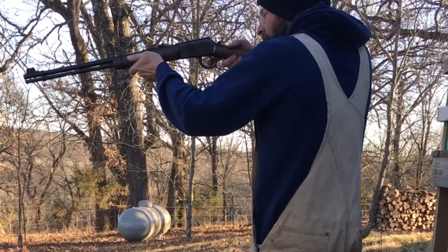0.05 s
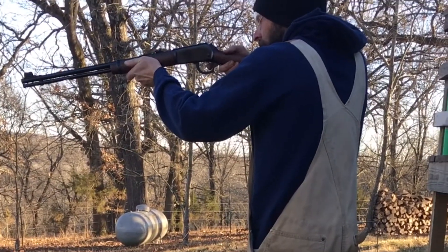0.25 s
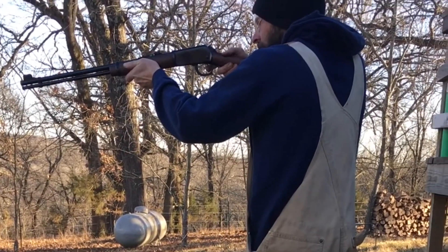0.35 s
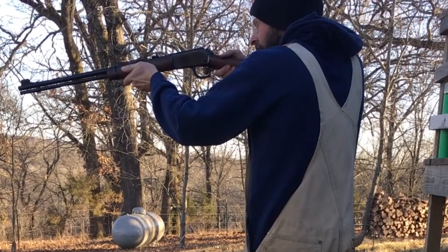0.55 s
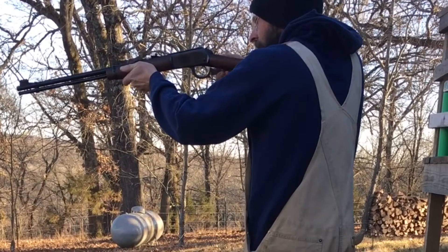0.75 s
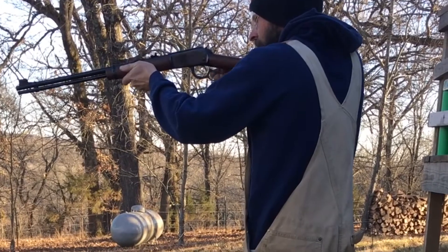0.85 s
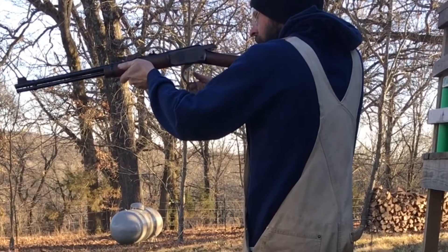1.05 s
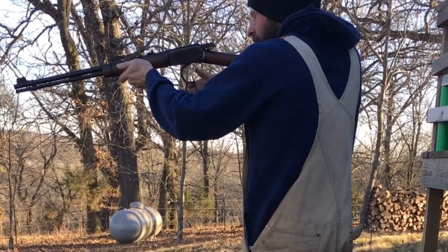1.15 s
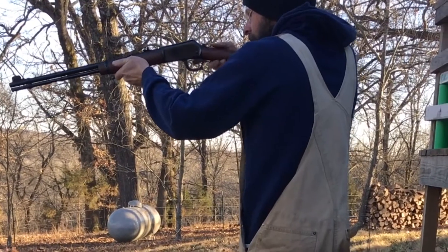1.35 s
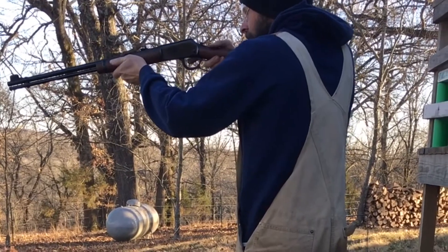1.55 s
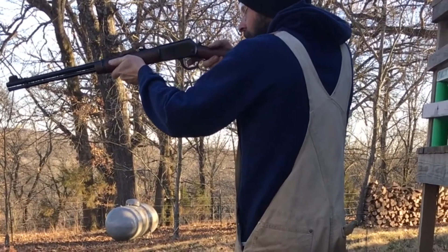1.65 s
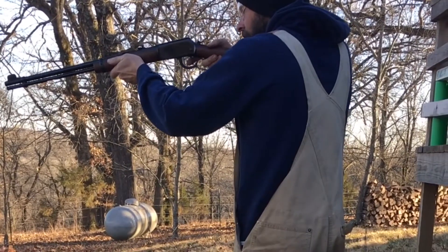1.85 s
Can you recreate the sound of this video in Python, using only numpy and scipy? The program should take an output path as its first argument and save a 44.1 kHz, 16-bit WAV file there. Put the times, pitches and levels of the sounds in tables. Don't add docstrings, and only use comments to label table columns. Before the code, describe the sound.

Single sharp rifle shot in a wooded yard, quick metal hit, rolling echo, lever clicks open and shut

```python
import sys
import numpy as np
from scipy import signal
from scipy.io import wavfile
from scipy.ndimage import uniform_filter1d

SR = 44100
rng = np.random.default_rng(int(sys.argv[2]) if len(sys.argv) > 2 else 0)


def generate_wav(sig):
    pcm = np.round(np.clip(np.atleast_2d(sig).T, -1, 1) * 32767).astype(np.int16)
    wavfile.write(sys.argv[1], SR, pcm)


def to_linear_factor(level_db):
    exponent = np.asarray(level_db, float) / 20
    return 10 ** exponent


N = 83790


def evened(x):
    return x / np.sqrt(np.mean(x ** 2) + 1e-20)


def read(points, hz):
    f, value = np.transpose(points)
    return np.interp(np.log(hz + 1), np.log(f + 1), value)


def add(mix, s, sound):
    part = mix[round(s * SR):][:len(sound)]
    part += sound[:len(part)]


def colour(x, points, tilt_db=0):
    hz = abs(np.fft.fftfreq(8192, 1 / SR))
    tilt = tilt_db * np.log2(np.clip(hz, 300, None) / 4000)
    log_gain = np.log(to_linear_factor(read(points, hz) + tilt))
    phase = -signal.hilbert(log_gain).imag
    taps = np.fft.ifft(np.exp(log_gain + 1j * phase)).real[:4096]
    return signal.oaconvolve(x, taps / np.linalg.norm(taps))[:len(x)]


def ring(modes, t, phases):
    x = 0
    for (hz, db, t60), phase in zip(modes, phases):
        x = x + to_linear_factor(db - 60 * t / t60) * np.sin(2 * np.pi * hz * t + phase)
    return x / np.sqrt(sum(to_linear_factor(2 * db) for _, db, _ in modes))


# (time [s], level [dB], length [s])
SHOCK_FRONTS = [
    (.2188, -6, .00005),
    (.2195, -2, .00008),
    (.2227, -3, .00008),
    (.2260, -12, .0001),
]
# (frequency [Hz], level [dB per Hz])
GAS_SPECTRUM = [(150, -18.5), (350, 0), (800, -2.5), (1450, 1.5), (3300, -6), (12800, -10), (15700, -11.5),
                (16500, -40.5)]
GAS_START_S, GAS_RISE_S, GAS_HOLD_S, GAS_T60 = .2165, 0.006, 0.013, 0.11
GAS_DB = -11


def blast():
    out, t = np.zeros(N), np.arange(SR // 4) / SR
    front_t = t[:400]
    for s, db, length in SHOCK_FRONTS:
        add(out, s, -to_linear_factor(db) * (1 - front_t / length) * np.exp(-front_t / length))
    rise = np.minimum(.3 + t / GAS_RISE_S, 1)
    decay = to_linear_factor(GAS_DB - 60 * np.maximum(t - GAS_HOLD_S, 0) / GAS_T60)
    add(out, GAS_START_S, rise * decay * colour(rng.standard_normal(len(t)), GAS_SPECTRUM))
    return out


# (time [s], level [dB], first half swing [s], strongest after [s], sign and weight [1])
PRESSURE_SWINGS = [
    (0.21, -17.5, .0068, .005, 1),
    (0.22, -3, 0.0016, 0.0022, -0.81),
    (.2232, -1.5, 0.006, 0.0063, -0.85),
    (0.2032, -33, 0.018, 0.0065, -1.45),
    (.1962, -28.5, .001, 0.0011, 0.98),
    (.2185, -15, .0004, .0015, 1),
    (.2865, -35, .002, .002, 1),
    (.291, -33, .005, .006, -1),
    (.491, -34, .0057, .006, 1),
    (.553, -47, .006, .007, 1),
]
SLOWING = .79


def thumps():
    out, t = np.zeros(N), np.arange(SR // 8) / SR
    for s, db, half, top, sign in PRESSURE_SWINGS:
        swell = t / top * np.exp(1 - t / top)
        add(out, s, sign * to_linear_factor(db) * swell * np.sin(np.pi * (t / half) ** SLOWING))
    return out


# (frequency [Hz], level [dB], decay t60 [s])
PLATE_MODES = [(1900, 2, .014), (2250, 1, .016), (2560, -2, .018), (2772, -3, .075), (4635, -3, .045),
               (6078, -12, .045), (6616, 0, .05), (6880, -2, .06), (8300, -11, .03), (9044, -14, .08),
               (9518, -10, .044), (11460, -13, .09), (12510, -13, .13), (13040, -18, .085),
               (14510, -27, .2)]
# (frequency [Hz], level [dB per Hz])
SPLAT_SPECTRUM = [(240, -63.5), (400, -13), (1500, -8.5), (3300, -10.5), (5460, -12.5), (6800, -5),
                  (10500, -18.5), (12900, -12.5), (16500, -38)]
# (frequency [Hz], level [dB per Hz])
RETURN_SPECTRUM = [(600, -25), (1500, -6), (2770, 0), (4600, -12), (7000, -18), (16000, -22)]
PLATE_S, RETURN_DELAY_S, SPLAT_T60 = .2872, .024, 0.05
PLATE_DB, SPLAT_DB, RETURN_DB = -3, -10.5, -22


def plate():
    out, t = np.zeros(N), np.arange(SR // 2) / SR
    hit = to_linear_factor(PLATE_DB) * ring(PLATE_MODES, t, rng.uniform(0, 2 * np.pi, len(PLATE_MODES)))
    hit += to_linear_factor(SPLAT_DB - 60 * t / SPLAT_T60) * colour(rng.standard_normal(len(t)), SPLAT_SPECTRUM)
    add(out, PLATE_S, hit * np.minimum(t / 0.00046, 1))
    copy = to_linear_factor(RETURN_DB) * colour(hit, RETURN_SPECTRUM)
    add(out, PLATE_S + RETURN_DELAY_S, copy * np.minimum(t / .002, 1))
    return out


CLICK_S = [.1958, .199, .2078, .211, .888, .9005, .931, .9333, .953, .9553, 1.197, 1.2005, 1.2048, 1.2085,
           1.2128, 1.2215, 1.226, 1.239, 1.2445, 1.25, 1.2542, 1.2585, 1.2645, 1.275, 1.285, 1.069, 1.5115,
           1.532, 1.829, 1.385]
# (level [dB], brightness [dB per octave], decay t60 [s])
CLICKS = [(-22.5, 1.5, 0.0047), (-19, -3, 0.0046), (-26, -5.5, 0.025), (-29, 3, 0.0089), (-48, 1, .015),
          (-22, 0, .009), (-35, 0, .008), (-29, 5, .007), (-42, 4, .01), (-12.5, -2, .02), (-38, 6, .009),
          (-44, 2, .01), (-32, 0, .012), (-27, 0, .016), (-30, -1, .016), (-38, 5, .01), (-36, -2, .012),
          (-37, -5, .03), (-42, -3, .015), (-25, 1, .014), (-6, 2, .011), (-8.5, 2.5, .018),
          (-19, -3.5, 0.025), (-36.5, -5.5, 0.057), (-40.5, -15, 0.1), (-54, 4, 0.018), (-51, -2, 0.022),
          (-52.5, 6, 0.12), (-54, 6, 0.021), (-51.5, -4.5, 0.11)]
# (frequency [Hz], level [dB], decay t60 [s])
STEEL_MODES = [(960, -16, .04), (1180, -5, .05), (2600, -12, .03), (4517, -10, .04), (6185, -12, .04),
               (7095, -7, .03), (8600, -9, .025), (10030, -9, .03), (11260, -11, .03), (13800, -13, .025)]
# (frequency [Hz], level [dB per Hz])
SNAP_SPECTRUM = [(200, -50), (400, -34), (800, -23), (1250, -10), (2570, -9), (7000, -7), (13900, -11),
                 (16700, -25)]
TICK_DB, STEEL_DB, RATTLE_DB, RATTLE_T60 = 4, -0.5, -22, 0.15


def action():
    out, t = np.zeros(N), np.arange(6000) / SR
    noise = rng.standard_normal((len(CLICKS), 6000))
    phases = rng.uniform(0, 2 * np.pi, (len(CLICKS), len(STEEL_MODES)))
    for s, (db, tilt_db, t60), v, p in zip(CLICK_S, CLICKS, noise, phases):
        modes = [(hz, d + tilt_db * np.log2(hz / 4000), r) for hz, d, r in STEEL_MODES]
        fade = to_linear_factor(-60 * t / t60) + to_linear_factor(RATTLE_DB - 60 * t / RATTLE_T60)
        snap = v * fade * np.minimum(t * SR / 10, 1)
        snap[20] += to_linear_factor(TICK_DB)
        steel = to_linear_factor(STEEL_DB - 30 * t / t60) * ring(modes, t, p)
        add(out, s, 0.35 * to_linear_factor(db) * (colour(snap, SNAP_SPECTRUM, tilt_db) + steel))
    return out


# (time [s], length [s], level [dB])
SLIDES = [
    (0.889, 0.11, -56),
    (1.196, 0.052, -59),
]


def slides():
    out = np.zeros(N)
    for s, length, db in SLIDES:
        t = np.arange(0, length, 1 / SR)
        v = rng.standard_normal((2, 6000))[:, :len(t)]
        grit = to_linear_factor(2.7 * evened(uniform_filter1d(v[0], 60))) * v[1]
        stroke = np.sin(np.pi * t / length) ** 0.3
        add(out, s, to_linear_factor(db) * stroke * colour(grit, SNAP_SPECTRUM, 0.84))
    return out


# (time [s], frequency [Hz],
# level [dB], decay t60 [s])
PINGS = [(.857, 9975, -68, .07), (.9025, 11983, -46, .035), (.911, 12618, -50, .1),
         (.9342, 15300, -28, .013), (.9008, 14000, -29, .008), (.9008, 11070, -29, .008),
         (.9333, 11500, -31, .006), (.9333, 10000, -35, .005), (.936, 7100, -42, .02),
         (.960, 12834, -52, .12), (.982, 12834, -59, .13), (1.006, 9518, -63, .2), (1.035, 12597, -67, .12),
         (1.441, 4517, -69, .3), (1.441, 2772, -72, .1), (1.876, 4517, -73, .2), (1.876, 9545, -76, .2),
         (1.876, 12624, -75, .2)]
# (time [s], frequency [Hz], level [dB], decay t60 [s])
STOCK = [
    (.9555, 1180, -30, .035),
    (.9555, 1400, -35, .03),
    (1.2128, 1230, -41, .04),
    (1.2545, 1170, -23, .045),
    (1.257, 330, -49, .12),
    (1.275, 620, -50, .12),
    (1.257, 2600, -31, .03),
    (1.275, 1200, -42, .06),
]


def pings():
    out, t = np.zeros(N), np.arange(8000) / SR
    notes = PINGS + STOCK
    for (s, hz, db, t60), v in zip(notes, rng.standard_normal((len(notes), 8000))):
        waver_db = 4.0 * evened(uniform_filter1d(v, 120))
        envelope = to_linear_factor(db + waver_db - 60 * t / t60) * np.minimum(t * 1000, 1)
        add(out, s, envelope * np.sin(2 * np.pi * hz * t))
    return out


# (frequency [Hz], decay t60 [s])
YARD_DECAY = [(500, 0.9), (1500, 0.38), (4000, 1), (8000, 0.93), (15000, 0.96)]


def yard(x):
    taps = np.zeros(SR)
    places = np.arange(200, SR - 20, 20)[:2190] + rng.integers(0, 20, 2190)
    taps[places] = rng.choice([-1., 1.], 2190)
    hz, t, z = signal.stft(taps, SR, nperseg=256)
    decay = to_linear_factor(-60 * t / read(YARD_DECAY, hz)[:, None])
    tail = signal.istft(z * decay, SR, nperseg=256)[1]
    return signal.fftconvolve(x, tail / np.linalg.norm(tail))[:N]


# (frequency [Hz], level [dB per Hz])
WOODS_SPECTRUM = [(88, -41), (150, -10.5), (341, -27.5), (689, -5.5), (777, -9), (891, -5.5), (1370, -2.5),
                  (4940, -31.5), (9000, -36), (11700, -52), (19800, -120)]
# (time [s], level [dB])
ROLL = [(.22, -39.5), (.35, -36), (.42, -47), (.49, -32), (.52, -31), (.56, -37), (.63, -33.5), (.8, -40),
        (1.0, -47), (1.3, -71.5)]
TRUNKS_PER_S, TRUNK_SPREAD_DB = 2000, 0.5
ECHO_S = [.354, .401, .462, .4958, .5016, .513, .573, .608, .613, .685, .709, .757, .485, .626, .644, .729,
          .80, .845, .523, .541, .468]
# (level [dB], spread t60 [s], brightness [dB per octave])
ECHOES = [(-25, .04, 1), (-30, .016, .5), (-27, .06, -1), (-11.5, .013, -3), (-15, .02, 2), (-22, .06, 1),
          (-20, .025, -.5), (-24, .03, -2), (-21, .045, .5), (-27, .025, 0), (-24, .05, .5), (-28, .09, -3),
          (-31, .03, 0), (-25, .07, -4), (-27, .05, -1), (-28, .04, 0), (-32, .05, -1), (-33, .05, -2),
          (-25, .04, -1), (-30, .04, 0), (-28, .03, 0)]
# (frequency [Hz], level [dB per Hz])
ECHO_SPECTRUM = [(150, -38), (400, -19), (750, -3), (1500, 0), (2300, -7), (4000, -26), (9000, -46),
                 (16000, -70)]
ECHO_TAIL_DB = -7
FLAT_T60 = .018


def woods():
    t = np.arange(N) / SR
    present = rng.random(N) < TRUNKS_PER_S / SR
    trunks = to_linear_factor(TRUNK_SPREAD_DB * np.minimum(rng.exponential(1, N), 5)) * present
    level = to_linear_factor(np.interp(t, *np.transpose(ROLL), right=-99)) * (t > ROLL[0][0])
    out = colour(evened(trunks * rng.choice([-1., 1.], N)) * level, WOODS_SPECTRUM)
    u = t[:4000]
    for s, (db, t60, tilt_db), v in zip(ECHO_S, ECHOES, rng.standard_normal((len(ECHOES), 4000))):
        echo = to_linear_factor(ECHO_TAIL_DB - 60 * u / t60) * v
        echo[30] += 6 * min(FLAT_T60 / t60, 1)
        add(out, s, to_linear_factor(db) * colour(echo, ECHO_SPECTRUM, tilt_db))
    return out


# (frequency [Hz], level [dB per Hz])
RUMBLE_SPECTRUM = [(40, -25), (90, -9.5), (200, -2), (330, 2.5), (550, -19), (1200, -37)]
RUMBLE_DB, RUMBLE_T60 = -43, .7


def rumble():
    t = np.arange(N) / SR - GAS_START_S
    decay = (t > 0) * to_linear_factor(RUMBLE_DB - 60 * t / RUMBLE_T60)
    return decay * colour(rng.standard_normal(N), RUMBLE_SPECTRUM)


# (frequency [Hz], level [dB], width [Hz])
HUM = [(59.3, -69, 9.8), (114.9, -53.5, 2), (230, -71, 9.8)]
# (frequency [Hz], level [dB per Hz])
AIR_SPECTRUM = [(30, -21), (60, 4.5), (95, -4), (420, -20.5), (650, -12.5), (1300, -12), (3000, -30.5),
                (16000, -41.5)]
AIR_DB = -59.5
DUCK_S, DUCK_END_S, DUCK_EASE_S = .2, .725, .03
DUCK_DB, EARLY_DB = -9.5, -5


def background():
    t = np.arange(N) / SR
    hum = np.zeros(N)
    for hz, db, width in HUM:
        drift = evened(uniform_filter1d(rng.standard_normal((2, N)), 4000))
        phase = 2 * np.pi * np.cumsum(hz + .5 * width * drift[0]) / SR
        hum += to_linear_factor(db + 3.5 + .15 * width * drift[1]) * np.sin(phase)
    onset = np.clip((t - DUCK_S) / .01, 0, 1)
    release = np.clip((DUCK_END_S - t) / DUCK_EASE_S + .5, 0, 1)
    duck = onset * release
    air = to_linear_factor(AIR_DB) * colour(rng.standard_normal(N + 4096), AIR_SPECTRUM)[4096:]
    return to_linear_factor(DUCK_DB * duck + EARLY_DB * (t < DUCK_S)) * hum + to_linear_factor(.5 * DUCK_DB * duck) * air


YARD_SHOT_DB, YARD_PLATE_DB, YARD_CLICK_DB = -13.5, -22.5, -32


def scene():
    shot, hit, clicks = blast(), plate(), action() + slides()
    wet = yard(to_linear_factor(YARD_SHOT_DB) * shot + to_linear_factor(YARD_PLATE_DB) * hit + to_linear_factor(YARD_CLICK_DB) * clicks)
    near = shot + hit + clicks + wet + pings() + thumps()
    return (near + rumble() + woods() + background())[None]


def low_pass(x):
    return signal.sosfilt(signal.butter(12, 16820, fs=SR, output="sos"), x)


def record(dry):
    limited = np.tanh(1.18 * dry) / 1.155
    edge = signal.firwin(101, 16100, window=("kaiser", 5), fs=SR)[None]
    return low_pass(signal.oaconvolve(limited, edge, "same"))


dry = scene()
out = record(dry)
generate_wav(out)
```